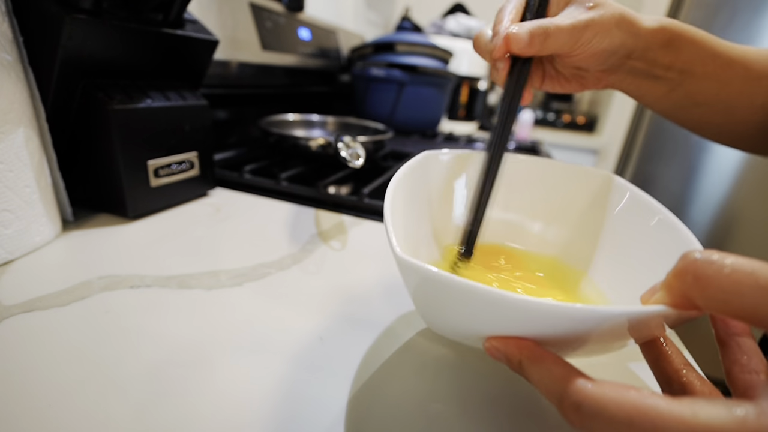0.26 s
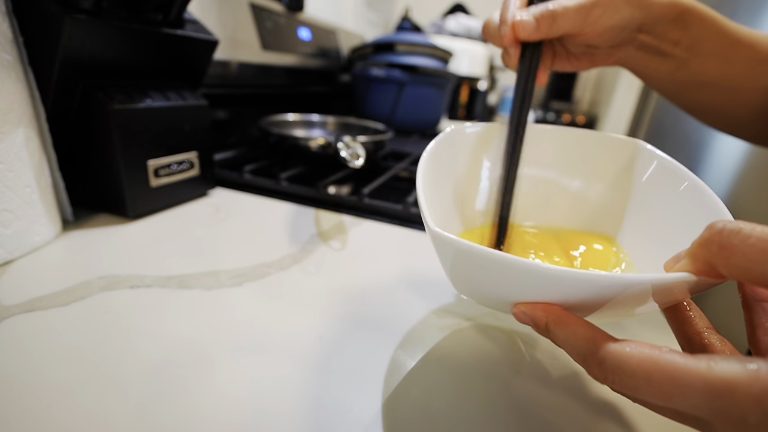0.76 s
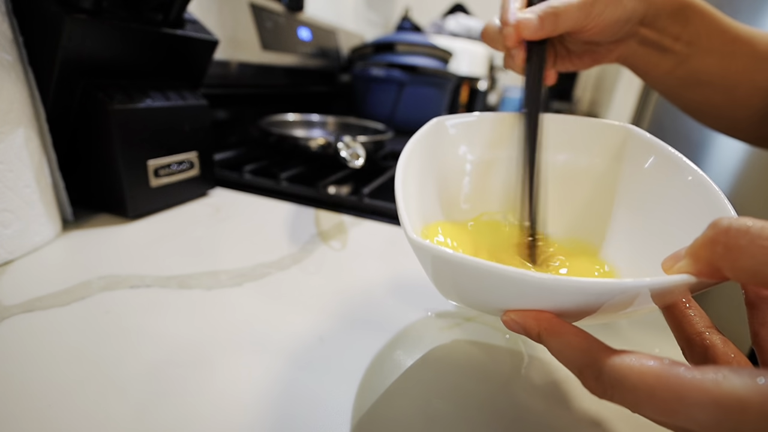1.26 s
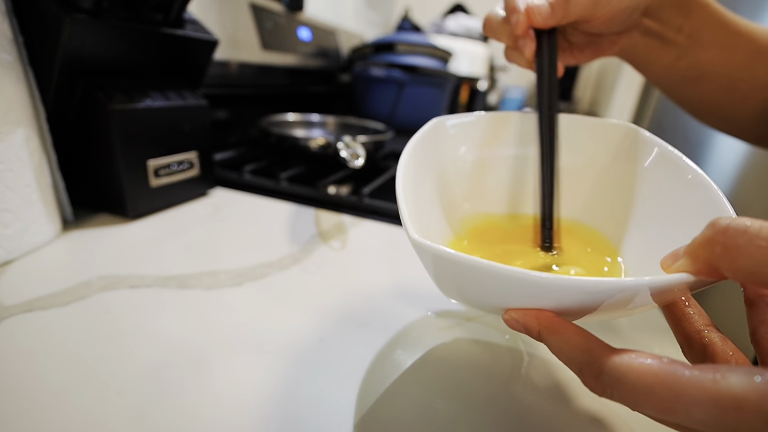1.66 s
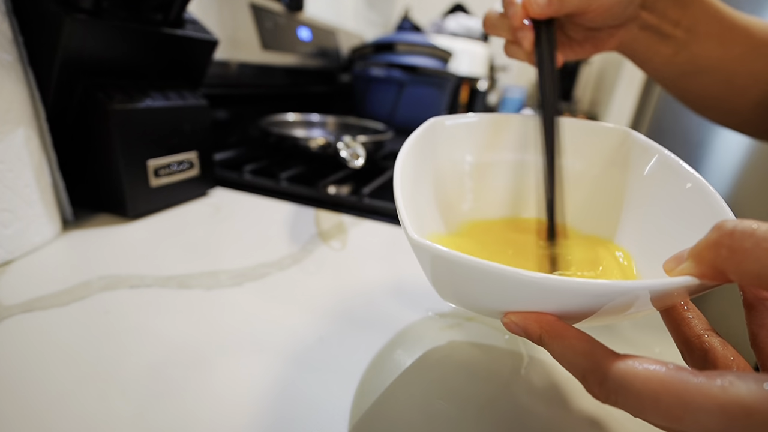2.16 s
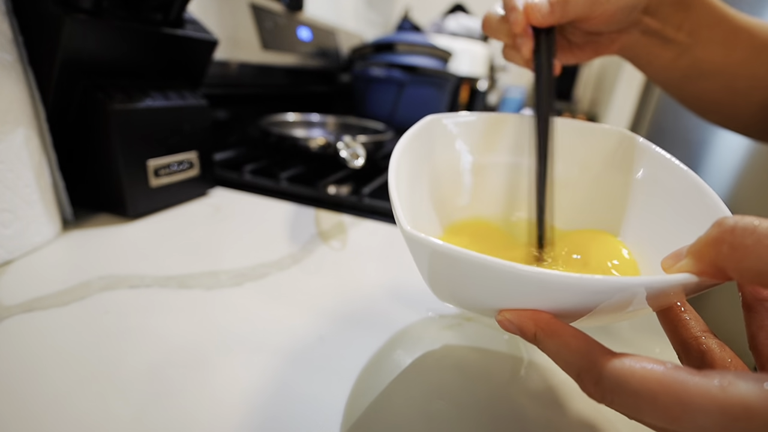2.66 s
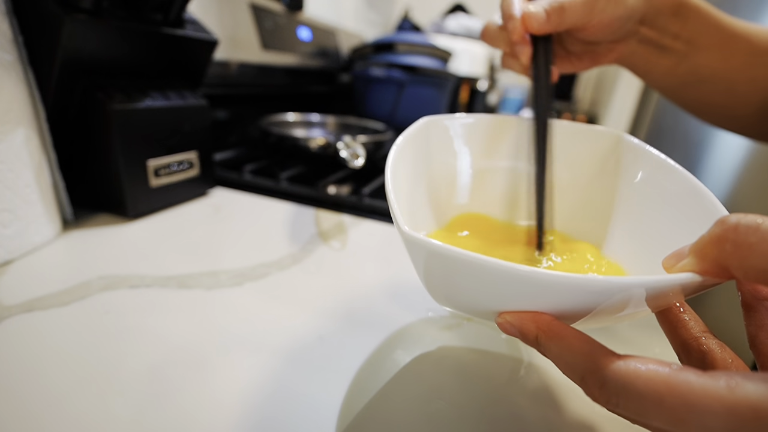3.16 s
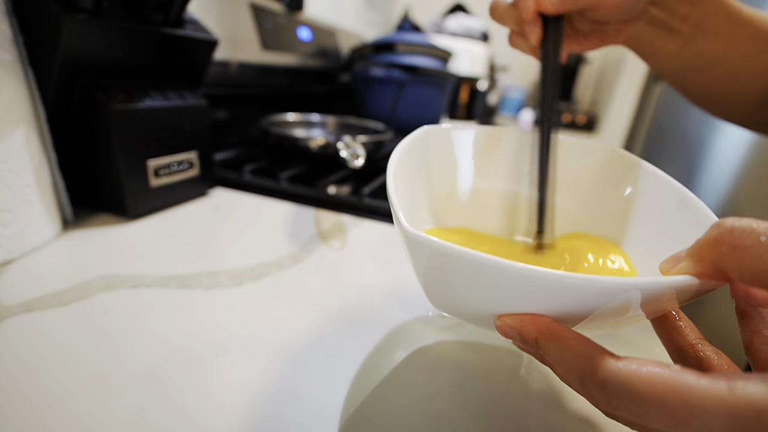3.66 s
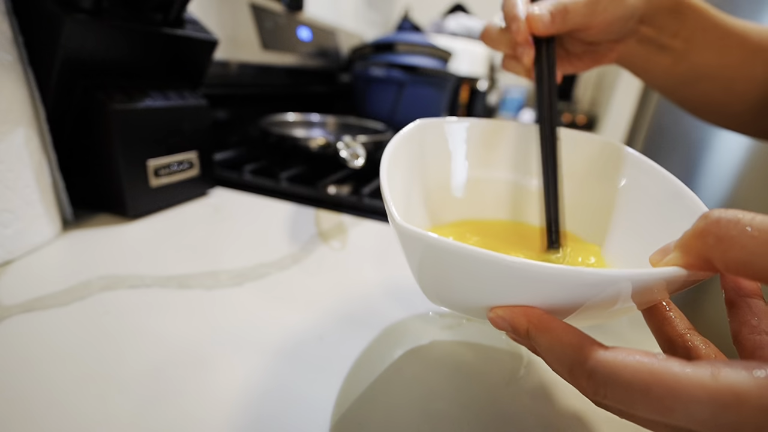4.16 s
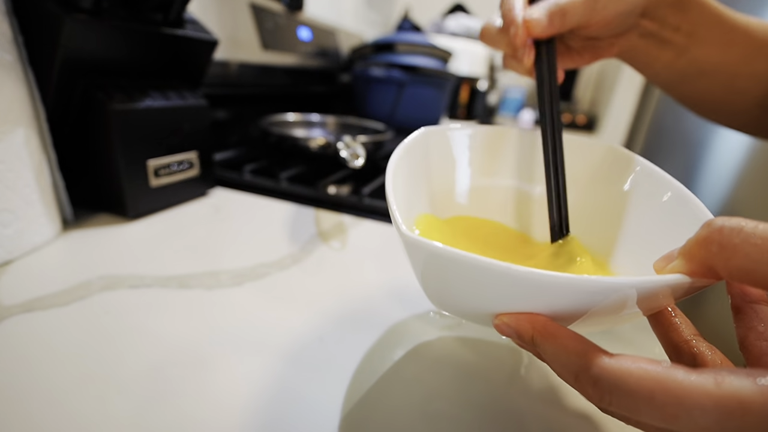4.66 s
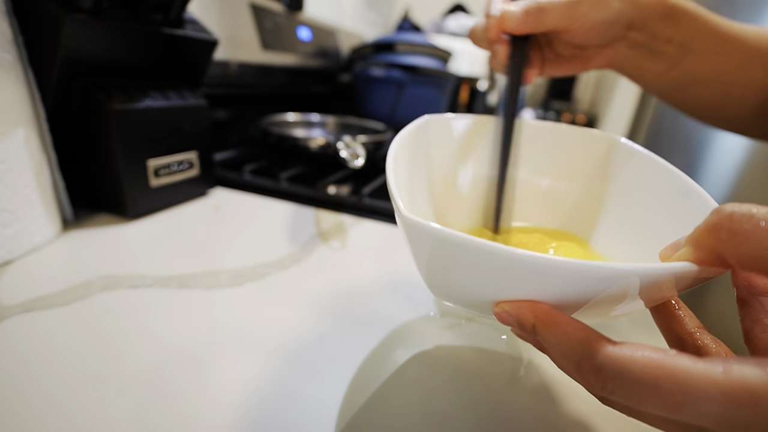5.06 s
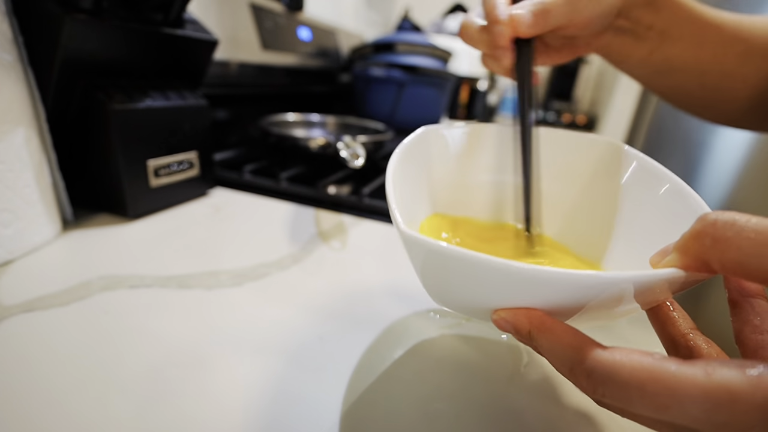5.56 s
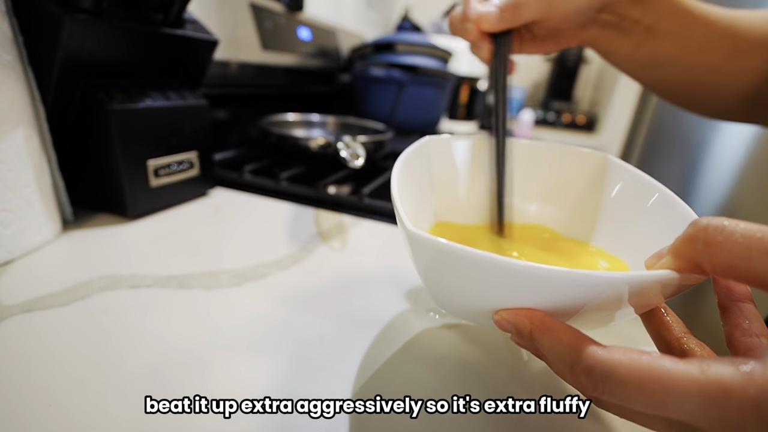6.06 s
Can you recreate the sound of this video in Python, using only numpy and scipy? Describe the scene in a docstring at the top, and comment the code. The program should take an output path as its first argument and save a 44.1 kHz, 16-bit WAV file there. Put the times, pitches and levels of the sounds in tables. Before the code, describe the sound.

Eggs are beaten briskly with chopsticks in a ceramic bowl, close to a stereo microphone and slightly right of centre. Crisp, bright clacks vary in pitch and wetness, with short bowl rings and tiny bubbling chirps. Near the end the rhythm breaks into knocks and quiet liquid strokes. Short reflections from counter and walls, faint hiss and a low motor hum surround it.

```python
"""Beating eggs with chopsticks

Chopsticks beat eggs in a hand-held ceramic bowl, about six strokes a second, in a quiet kitchen.
Strokes clack on the wall (a burst of tiny impacts), ring the bowl (fading sines) and slap the egg.
Gliding tones follow: mostly air trapped in the egg, a few long high rings of bowl or sticks.
Then the hand slows: the sticks knock, swish softly through the egg (filtered noise) and knock again.
Air rushes and an appliance hums."""
import sys
import numpy as np
from scipy import signal
from scipy.fft import rfft, irfft, next_fast_len
from scipy.io import wavfile
from scipy.ndimage import uniform_filter1d

SR = 44100
rng = np.random.default_rng(int(sys.argv[2]) if len(sys.argv) > 2 else 0)


def file_out(sig):
    """Save sig as 16-bit WAV at sys.argv[1]."""
    # one column per channel
    cols = np.atleast_2d(sig).T
    # limit, then scale
    lim = np.clip(cols, -1, 1)
    pcm = np.round(lim * 32767).astype(np.int16)
    wavfile.write(sys.argv[1], SR, pcm)


N = 278271  # length of the scene [samples]
LEAD = 256  # samples kept before each blow
T = (np.arange(SR // 2) - LEAD) / SR  # time around one blow [s]
AFTER = np.maximum(T, 0)  # time since the blow [s]


def amp(db):
    """Turns decibels into a gain."""
    return 10 ** (np.asarray(db) / 20)


def read(points, hz):
    """Reads a table of (frequency [Hz], value), joined by lines over log frequency."""
    table_hz, value = np.transpose(points)
    return np.interp(np.log(hz + 1), np.log(table_hz + 1), value)


def unit(x):
    """Scales each channel to an energy of 1."""
    return x / np.sqrt(np.sum(x ** 2, -1, keepdims=True) + 1e-20)


def add(mix, s, sound):
    """Mixes in a sound whose blow falls at s seconds, trimmed to the scene."""
    start = round(s * SR) - LEAD
    sound = sound[:, max(-start, 0):]
    part = mix[:, max(start, 0):][:, :sound.shape[1]]
    part += sound[:, :part.shape[1]]


def hz_of(x):
    """Gives the frequencies of a sound's spectrum."""
    return np.fft.rfftfreq(x.shape[-1], 1 / SR)


def colour(x, db):
    """Filters with the given gain at each frequency, without sounding ahead of the input."""
    n = x.shape[-1]
    cepstrum = irfft(np.log(amp(db)), n)
    # folding the cepstrum forward in time makes the filter causal
    cepstrum[1:n // 2] *= 2
    cepstrum[n // 2 + 1:] = 0
    return irfft(rfft(x) * np.exp(rfft(cepstrum)), n)


def widen(x, width):
    """Filters the side row of a (middle, side) pair, which sets the stereo width by frequency."""
    return np.array([x[0], colour(x[1], read(width, hz_of(x)))])


def bump(hz, centre_hz, octaves):
    """Draws a bell curve over log frequency."""
    return np.exp(-.5 * (np.log2((hz + 1) / centre_hz) / octaves) ** 2)


def burst(spectrum_db, t60, rattle_db, rattle_t60):
    """A contact is a dense cluster of tiny impacts, then a weaker rattle; no one pitch stands far out."""
    rise = np.exp(np.minimum(T, 0) / 0.00016)
    decay = amp(-60 * AFTER / t60) + amp(rattle_db - 60 * AFTER / rattle_t60)
    spectrum = rfft(rng.standard_normal((2, len(T))) * rise * decay)
    # partly evens out the random peaks, then fades what this smears ahead of the blow
    even = irfft(spectrum / (abs(spectrum) + 1e-9) ** 0.22, len(T))
    span = np.exp(np.minimum(T + 0.00099, 0) / 0.0013) * (T < T[-1] / 2)
    return unit(colour(even * span, spectrum_db)) * np.sqrt(0.0039 * SR)  # unit rms over 3.9 ms


# how long echoes take to fall by 60 dB: (frequency [Hz], time [s])
ROOM_DECAY = [(500, 0.59), (2500, 0.32), (7000, 0.33), (14000, 0.26)]


def reflections(patchy_db):
    """Dense echoes of counter and walls come in clumps, and each band dies at its own speed."""
    hz, t, bands = signal.stft(rng.standard_normal((2, len(T))), SR, nperseg=256)
    clumps = rng.standard_normal(bands.shape[1:])
    clumps = uniform_filter1d(clumps, size=3, axis=0)
    clumps = uniform_filter1d(clumps, size=9, axis=1)
    decay_db = -60 * t / read(ROOM_DECAY, hz)[:, None]
    bands = bands * amp(patchy_db * clumps / clumps.std() + decay_db)
    tail = signal.istft(bands, SR, nperseg=256)[1][:, :len(T)]
    fade_in = np.clip((np.arange(len(T)) / SR - .002) / 0.004, 0, 1)  # echoes start 2 ms late
    return unit(tail * fade_in)


# tone of the echoes, before each sound's own echo level: (frequency [Hz], level [dB])
ROOM_TONE = [(300, 1), (1300, -5), (2200, -3), (3300, -2.5), (4500, -1.5), (6000, -3), (7500, -3),
             (8700, -9.5), (10500, -1.5), (15000, -3.5)]
# side gain for echoes and for the ringing bowl: (frequency [Hz], level [dB])
ROOM_WIDTH = [(500, -10.5), (2000, -21.5), (4000, -15.5), (5500, -5.5), (7200, -3.5), (12000, -1)]


def echo_path(walls):
    """Echoes are partly fixed by the walls and partly change as the bowl moves."""
    mixed = unit(walls + 0.77 * reflections(patchy_db=3.5))
    return widen(colour(mixed, read(ROOM_TONE, hz_of(T))), ROOM_WIDTH)


# side gain for direct sound: (frequency [Hz], level [dB])
DIRECT_WIDTH = [(1000, -30), (3500, -18.5), (6000, -14), (8000, -13), (10000, -9), (12500, -2.5)]


def in_room(sound, path, room_db):
    """Direct sound arrives first, and its middle row also feeds the echoes."""
    echoes = signal.fftconvolve(sound[:1], path, axes=1)[:, :len(T)]
    return widen(sound, DIRECT_WIDTH) + amp(room_db) * echoes


# ringing modes of the bowl, before the blow's level and damping:
# (frequency [Hz], level [dB], time to fall 60 dB [s])
BOWL_MODES = [(1854, -39.5, 0.37), (2912, -30.5, 0.27), (3648, -37, .18), (3738, -39, .13),
              (978, -62, 0.15), (1426, -30.5, 0.019), (2280, -51, 0.076), (3160, -32.5, 0.08),
              (3350, -42, 0.24), (4350, -38, 0.27), (4300, -65, 0.14), (6160, -50, 0.099),
              (5950, -64, 0.29), (6850, -32, 0.13), (6810, -49, 0.088), (7000, -53, 0.12),
              (8560, -27, 0.15), (9400, -49, .18)]


def bowl(db, spot_db, corner_hz, damping):
    """The bowl rings; the spot struck sets the main modes' shares, a soft contact spares the high ones."""
    hz, mode_db, t60 = np.transpose(BOWL_MODES)
    share_db = 3 * rng.standard_normal(len(hz))
    share_db[:4] = *spot_db, spot_db[-1]  # the third and fourth modes share one value
    size = amp(db + mode_db + share_db) / np.hypot(1, (hz / corner_hz) ** 3)
    decay = amp(-60 * damping * AFTER / t60[:, None])
    modes = size[:, None] * decay * np.exp(2j * np.pi * hz[:, None] * AFTER)
    phases = np.exp(2j * np.pi * rng.random((2, len(hz))))
    ring = (phases @ modes).real * np.clip(T / 0.001, 0, 1)  # fades in over 1 ms
    return widen(ring, ROOM_WIDTH)


# a wetter slap weakens the 1.9 kHz mode and strengthens the 2.9 kHz mode: dB gained per dB of slap
WET_LOW_MODE, WET_MID_MODE = -0.64, 0.75
LOW_MODE_DB, MID_MODE_DB = 0.5, -4.5
MID_MODE_SHARE = 0.46  # the 2.9 kHz mode takes a share of the upper ring


def mode_shares(upper_db, slap_db):
    """The spot struck and the slap of the egg set the extra dB of the 1.9, 2.9 and 3.7 kHz modes."""
    low_db = LOW_MODE_DB + WET_LOW_MODE * slap_db
    mid_db = MID_MODE_DB + MID_MODE_SHARE * upper_db + WET_MID_MODE * slap_db
    return [low_db, mid_db, upper_db]


# slow sweeps of the sticks through the egg:
# (middle [s], length [s], level [dB], resonance at the start [Hz])
SWISHES = [(.01, .13, -41, 990), (5.347, .17, -49.5, 1110), (5.535, .13, -46, 2030),
           (5.707, .13, -45.5, 2380), (5.80, .066, -46.5, 2230), (5.909, .1, -43, 3540),
           (6.116, .046, -43, 3730), (6.21, .054, -43, 1330), (6.30, .052, -46, 3670)]
# tone of the stick tips on the bottom: (frequency [Hz], relative level [dB])
SCRAPE_TONE = [(300, -49), (1200, -4), (2200, 3), (3800, 6), (5200, -8), (8500, -5.5), (16000, -41)]
SWISH_RISE = 1.006  # the hollow behind the sticks closes, so its resonance climbs by this ratio


def swishes(walls):
    """Sticks drag through the egg: wet grains in a moving hollow, a dry scrape and the rubbed bowl."""
    out, hz, path = np.zeros((2, N)), hz_of(T), echo_path(walls)
    for s, length, db, start_hz in SWISHES:
        progress = np.clip(T / length, 0, 1)
        grain_db = 4.5 * np.minimum(rng.exponential(1, len(T)), 6)
        grains = rng.standard_normal((2, len(T))) * amp(grain_db) * np.sin(np.pi * progress)
        # shift the resonance down to 0 Hz, low-pass there, and shift back: a moving band-pass
        turn = np.exp(2j * np.pi * np.cumsum(start_hz * SWISH_RISE ** progress) / SR)
        low_pass = signal.butter(2, start_hz * 0.1, fs=SR)
        hollow = (turn * signal.lfilter(*low_pass, grains / turn)).real
        scrape = colour(grains, read(SCRAPE_TONE, hz))
        ring = bowl(0, [-4, 2, 0], corner_hz=4500, damping=3.9)
        rubbed = signal.fftconvolve(grains, ring, axes=1)[:, :len(T)]
        swish = unit(hollow) + amp(-2) * unit(scrape) + amp(0.5) * unit(rubbed)
        swish = amp(db) * unit(swish) * np.sqrt(length * SR / 2)
        add(out, s - length / 2, in_room(swish, path, room_db=-3))
    return out


# one row a stroke, clack levels before the common lift:
# (time [s], clack level [dB], pitch the grip favours [Hz], slap of the egg near 3.5 kHz [dB],
# extra ring of the bowl's upper modes [dB])
STROKES = [(-0.018, -23.5, 8700, 10, -12.5), (0.17, -19.5, 8280, 4, 9), (0.3138, -17, 7270, 2.5, -14),
           (0.4711, -13, 7820, -3, 5.5), (0.651, -18, 8440, -3, -14), (0.8001, -16.5, 8450, 3.5, 1),
           (0.953, -13.5, 9000, 0, 12.5), (1.1116, -14, 7400, 3.5, -4), (1.2803, -15.5, 7640, 2.5, 15),
           (1.4464, -16.5, 8540, -5.5, -17), (1.6029, -14.5, 7630, 3.5, -24), (1.7728, -15, 8100, 4, -9),
           (1.9422, -17.5, 6300, 3.5, 15), (2.0927, -14.5, 7900, -0.5, 10.5), (2.2605, -12, 8620, -3, 9.5),
           (2.433, -16.5, 7770, 7.5, -8), (2.6013, -17.5, 8660, 8.5, 14.5), (2.759, -13.5, 8640, 0, 13),
           (2.9259, -13, 8500, -5, -4), (3.101, -12.5, 9000, -.5, -11), (3.2608, -16.5, 8600, 4, 7),
           (3.4281, -18, 8740, 1, 8), (3.5818, -15.5, 5800, 9, 5), (3.7639, -14.5, 6500, 6.5, 8),
           (3.927, -12.5, 7960, 6.5, -28), (4.1012, -14, 8900, -1.5, 0), (4.2783, -15.5, 8800, -3, 4.5),
           (4.433, -15.5, 9000, 5, -10), (4.4421, -23.5, 8600, 5, -17), (4.618, -14, 8940, 7, -6),
           (4.791, -13.5, 8960, 2.5, -35), (4.9734, -16, 8300, 3.5, -25), (5.135, -25.5, 8550, 9, -17)]
# tone of the clack: (frequency [Hz], relative level [dB])
CLACK_TONE = [(200, -30.5), (880, -32.5), (1280, -13), (1650, -19), (2200, -11), (2700, -16.5), (3300, -8),
              (4000, -13.5), (6300, -7), (6800, -13), (7400, -2.5), (10300, -8.5), (13100, -14),
              (16000, -24)]
# peaks and hollows of the clack as the microphone hears it: (frequency [Hz], width [Hz], level [dB])
CLACK_PEAKS = [(8690, 430, 8), (13600, 370, -23), (14000, 920, 7.5), (11400, 250, -9.5)]
# strokes' thud near 1.2 kHz before the slap's effect, weakest mid-beating: (time [s], level [dB])
THUD_LEVEL = [(0, 27.5), (.17, 10.5), (.48, 3), (.95, 4.5), (1.28, -2), (2.55, -6.5), (3.2, 2.5),
              (3.65, -3), (4.28, 0.5), (4.55, 13), (4.85, 1.5), (5.13, 12)]
WET_THUD = -0.29  # a wetter slap weakens the thud: dB gained per dB of slap
CLACK_LIFT_DB, GRIP_DB, STROKE_ROOM_DB = 1.0, 5, 0.91  # GRIP_DB lifts the favoured pitch


def beating(walls):
    """In quick strokes the hard stick tips clack on the wall and slap the egg."""
    out, hz = np.zeros((2, N)), hz_of(T)
    clack_db = read(CLACK_TONE, hz)
    for peak_hz, width, peak_db in CLACK_PEAKS:
        clack_db = clack_db + peak_db / (1 + (2 * (hz - peak_hz) / width) ** 2)
    for s, db, grip_hz, slap_db, upper_db in STROKES:
        thud_db = np.interp(s, *np.transpose(THUD_LEVEL)) + WET_THUD * slap_db
        tip = burst(clack_db, t60=.009, rattle_db=-13, rattle_t60=.045)
        tone_db = GRIP_DB * bump(hz, grip_hz, .04)  # each stroke has its own favoured pitch
        tone_db = tone_db + thud_db * bump(hz, 1210, 0.57) + slap_db * bump(hz, 3490, 0.59)
        clack = amp(db + CLACK_LIFT_DB) * colour(tip, tone_db)
        ring = bowl(db + 13.5, mode_shares(upper_db, slap_db), corner_hz=14100, damping=0.89)
        add(out, s, in_room(clack, echo_path(walls), STROKE_ROOM_DB) + ring)
    return out


# tone of the low rush of air: (frequency [Hz], relative level [dB])
AIR_TONE = [(12, -51), (20, 2), (149, 0), (315, -5), (381, -6), (447, -5.5), (549, -7), (665, -8),
            (844, -2), (900, -18), (1170, -53), (1980, -120)]
# tone of the faint hiss: (frequency [Hz], relative level [dB])
HISS_TONE = [(400, -17.5), (900, -7), (3000, -1.5), (6000, -9.5), (10000, -13), (16000, -33)]
AIR_DB, HISS_DB = -59.5, -56
# side gain for air and hiss: (frequency [Hz], level [dB])
AIR_WIDTH = [(30, -36.5), (120, -16), (300, -8.5), (2000, -8.5), (8000, -4.5)]
# tones of the appliance, before the common shift: (frequency [Hz], level [dB])
HUM_TONES = [(64.6, -71), (118.4, -66.5), (156.1, -64.5), (236.9, -73), (274.5, -69), (360.7, -67),
             (393.0, -65), (549.1, -72.5)]
HUM_SHIFT_DB = -2.0


def kitchen():
    """Filtered noise makes a low rush and faint hiss; wavering sines make an appliance motor's hum."""
    rush, hiss = rng.standard_normal((2, 2, next_fast_len(N, True)))
    hz, t = hz_of(rush), np.arange(N) / SR
    rush = amp(AIR_DB) * unit(colour(rush, read(AIR_TONE, hz)))
    hiss = amp(HISS_DB) * unit(colour(hiss, read(HISS_TONE, hz)))
    out = widen((rush + hiss) * np.sqrt(N), AIR_WIDTH)[:, :N]
    for tone_hz, db in HUM_TONES:
        steps = np.cumsum(rng.standard_normal(25))
        drift = np.interp(t, np.linspace(0, t[-1], num=25), steps)  # slow random walk of the phase
        tone = np.sin(2 * np.pi * (tone_hz * t + rng.random()) + 0.46 * drift)
        out[0] += amp(db + HUM_SHIFT_DB) * np.sqrt(2) * tone
    return out


# tone of the wet click: (frequency [Hz], relative level [dB])
WET_TONE = [(300, -45), (1200, -26.5), (2200, -2), (4500, 7.5), (7000, 0.5), (10000, -11), (16000, -27.5)]


def click_and_ring(hz, db, t60, glide, click_db):
    """A wet click starts a fading tone that glides and wobbles, as when an air pocket changes shape."""
    wobble = .25 * uniform_filter1d(rng.standard_normal(len(T)), size=60)  # octaves
    glide_time = np.minimum(AFTER, min(t60 / 2, .018))  # the glide stops within 18 ms
    pitch = hz * 2 ** (glide * glide_time + wobble)
    swell = 1 - np.exp(-AFTER * hz / 2.3)  # builds up over the first few cycles
    ring = amp(-60 * AFTER / t60) * swell * np.sin(2 * np.pi * np.cumsum(pitch) / SR)
    click = burst(read(WET_TONE, hz_of(T)), t60=.003, rattle_db=-20, rattle_t60=.025)
    return amp(db) * (ring + amp(click_db) * click)


# ringing tones after strokes: air pockets under the egg, and a few long high rings of bowl or sticks:
# (time [s], pitch [Hz], level [dB], time to fall 60 dB [s], glide [octaves/s])
RINGING_TONES = [(0.169, 3265, -11.5, 0.05, 3.5), (0.169, 4154, -14.5, 0.045, -1),
                 (0.313, 3340, -9, 0.029, -8.5), (.652, 3330, -6.5, 0.047, 3),
                 (.801, 3490, -10.5, 0.068, 18.5), (1.447, 3240, -16.5, 0.043, 10),
                 (1.941, 3442, -13.5, 0.038, 0), (2.095, 3450, -17, 0.053, 5), (2.434, 3596, -14, 0.05, -3),
                 (2.605, 3074, -14, 0.042, -3), (3.428, 2254, -13.5, 0.069, 40.5),
                 (3.552, 3060, -23, 0.034, 17), (3.583, 5670, -21, 0.36, -4),
                 (3.763, 3323, -11.5, 0.039, 2), (3.763, 6410, -15, 0.096, -4.5),
                 (4.974, 2163, -13, .025, 7), (5.313, 6920, -26.5, 0.056, -1)]
# films of egg that burst at the surface as the sticks lift, and a short high tone with the light tap at 2.17 s:
# (time [s], pitch [Hz], level [dB])
POPS = [(1.254, 2820, -25.5), (2.1715, 6460, -19.5), (3.182, 4284, -14), (3.4999, 3455, -13.5),
        (4.5184, 1845, -11.5), (4.533, 5200, -18.5), (5.2391, 5240, -17), (5.2403, 1500, -13),
        (5.3801, 3590, -22), (5.4671, 6560, -36)]
RING_CLICK_DB, POP_CLICK_DB = -16.5, -12  # wet click relative to the ring
POP_T60_S, POP_GLIDE_OCT_PER_S = 0.018, -10.5  # short and sagging


def rings_and_pops(walls):
    """Air pockets under the egg, and a few rings of bowl or sticks, ring on; surface films pop at once."""
    out, path = np.zeros((2, N)), echo_path(walls)
    for s, hz, db, t60, glide in RINGING_TONES:
        tone = click_and_ring(hz, db, t60, glide, RING_CLICK_DB)
        add(out, s, in_room(tone, path, room_db=-7.5))
    for s, hz, db in POPS:
        pop = click_and_ring(hz, db, POP_T60_S, POP_GLIDE_OCT_PER_S, POP_CLICK_DB)
        add(out, s, in_room(pop, path, room_db=-10.0))
    return out


# knocks on the wall, a light tap, two blunt blows and a small rebound:
# (time [s], thud level [dB], corner that softens the contact [Hz],
# extra thud near 970 Hz [dB], ring of the bowl [dB], extra ring of its upper modes [dB])
KNOCKS = [(2.1716, -32, 7000, -13, -15, -10), (5.18, -15, 2450, 5, 5, -17), (5.2011, -24, 5430, -7, -28, 1),
          (6.0003, -15, 3340, -7, 3, 24.5)]
# tone of the thud: (frequency [Hz], relative level [dB])
THUD_TONE = [(200, -58), (700, -26), (930, -8), (1130, -12.5), (1480, 1), (1700, -3.5), (2250, -1),
             (2700, -4), (3500, 1.5), (4400, -8), (6300, -7.5), (8300, 5.5), (11000, -4), (16000, -12.5)]
KNOCK_LOW_MODE_DB = 17  # every knock drives the 1.9 kHz mode hard


def knocks(walls):
    """Knocks give a thud and a ring, shortened because the sticks stay on the wall."""
    out, hz, path = np.zeros((2, N)), hz_of(T), echo_path(walls)
    for s, db, corner_hz, body_db, ring_db, upper_db in KNOCKS:
        spot_db = [KNOCK_LOW_MODE_DB, *mode_shares(upper_db, 0)[1:]]
        softening_db = 10 * np.log10(1 + (hz / corner_hz) ** 4)
        thud_db = read(THUD_TONE, hz) + body_db * bump(hz, 970, 0.1) - softening_db
        thud = amp(db) * burst(thud_db, t60=.018, rattle_db=-12, rattle_t60=.06)
        ring = bowl(ring_db, spot_db, corner_hz, damping=1.33)
        add(out, s, in_room(thud, path, room_db=-2.5) + ring)
    return out


def scene():
    """Everything sounds in one room, as left and right; the bowl is a little to the right."""
    walls = reflections(patchy_db=3)
    work = swishes(walls) + beating(walls) + rings_and_pops(walls) + knocks(walls)
    no_bass = signal.butter(3, 380, "high", fs=SR, output="sos")  # small things radiate no bass
    middle, side = signal.sosfilt(no_bass, work)
    still_middle, still_side = kitchen()
    left = amp(-.55) * (middle + side) + still_middle + still_side
    right = amp(.55) * (middle - side) + still_middle - still_side
    return np.array([left, right])


EDGE_HZ = 16000  # upper band limit


def record(dry):
    """The sharpest peaks are rounded off near full scale, then the top of the treble is cut."""
    rounded = dry / (1 + (dry / 1.05) ** 8) ** (1 / 8)
    low_pass = signal.firwin(127, EDGE_HZ, window=("kaiser", 8), fs=SR)
    return signal.oaconvolve(rounded, low_pass[None], "same")


dry = scene()
out = record(dry)
file_out(out)
```